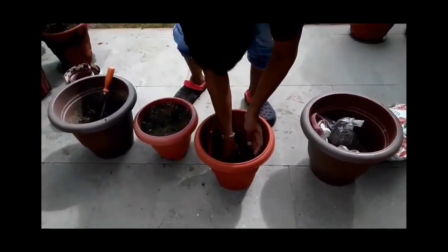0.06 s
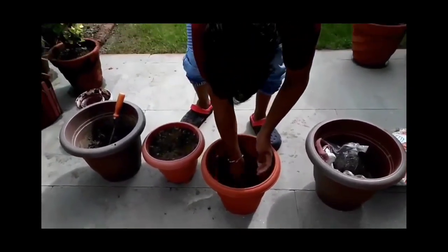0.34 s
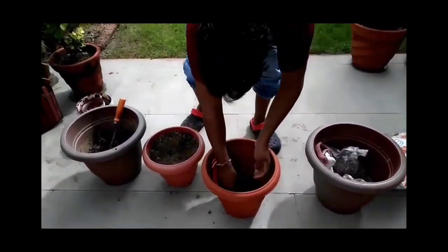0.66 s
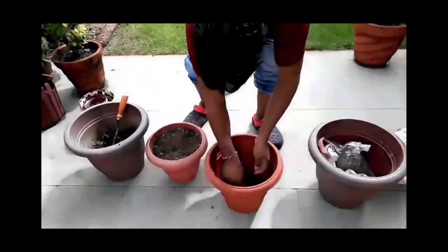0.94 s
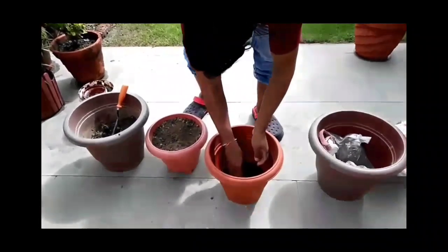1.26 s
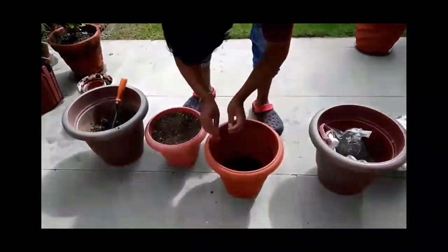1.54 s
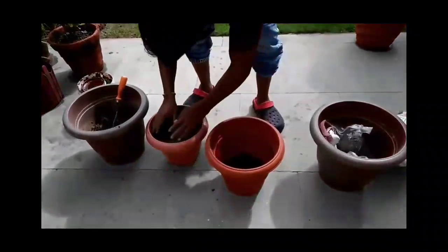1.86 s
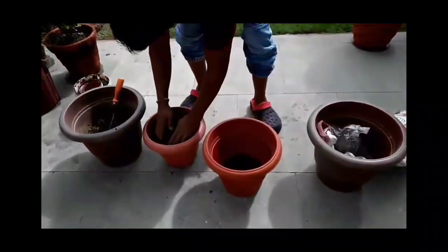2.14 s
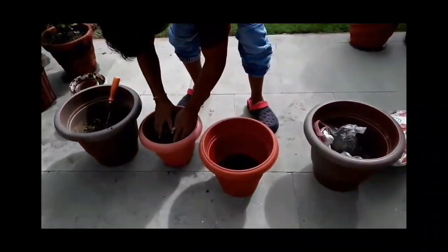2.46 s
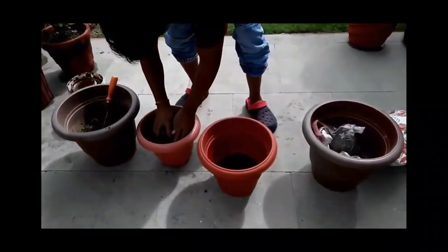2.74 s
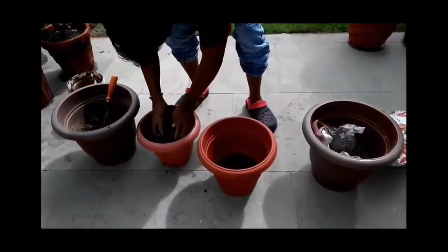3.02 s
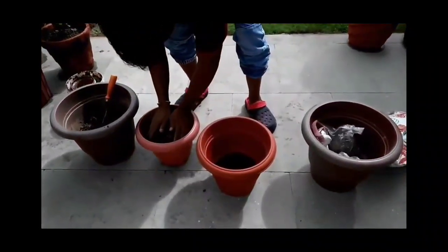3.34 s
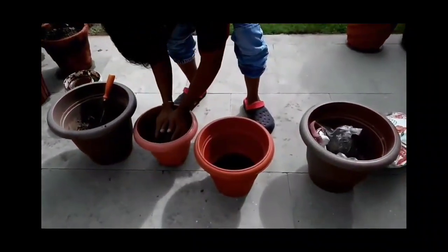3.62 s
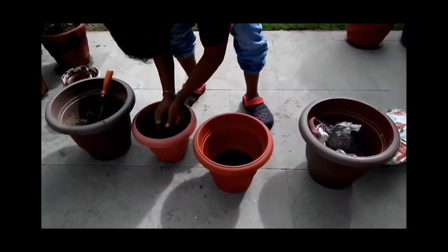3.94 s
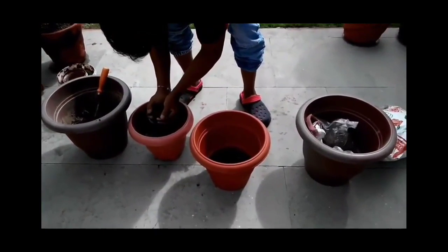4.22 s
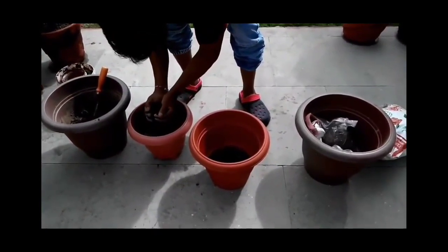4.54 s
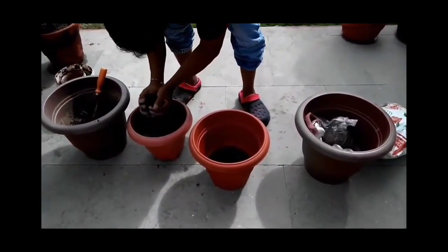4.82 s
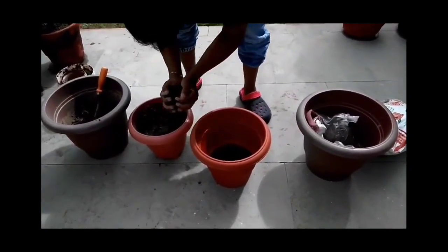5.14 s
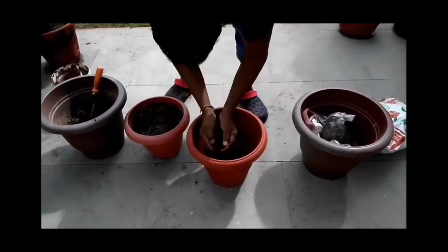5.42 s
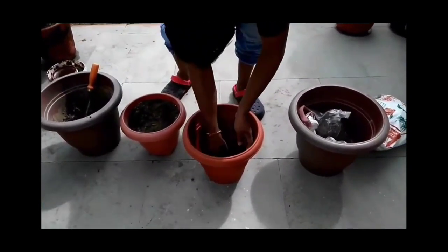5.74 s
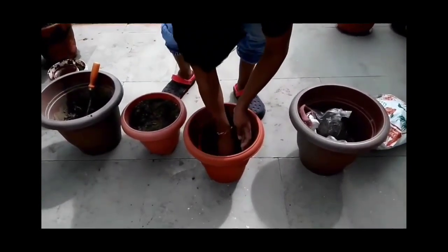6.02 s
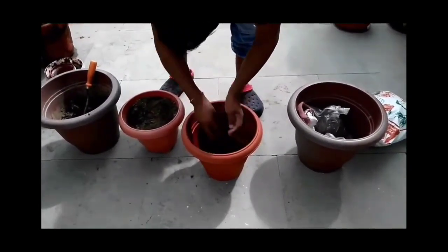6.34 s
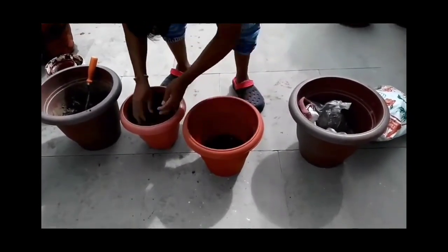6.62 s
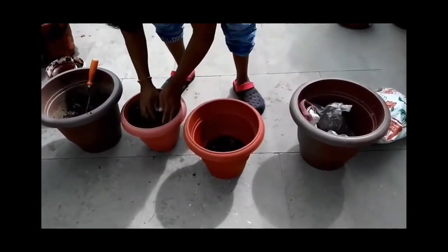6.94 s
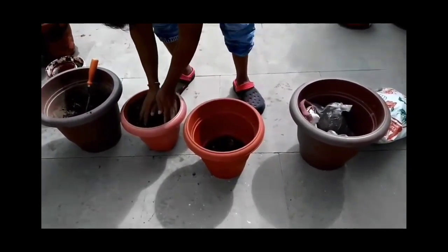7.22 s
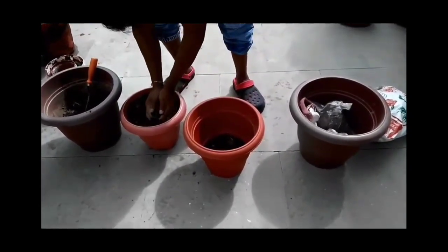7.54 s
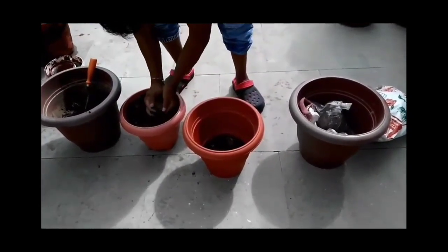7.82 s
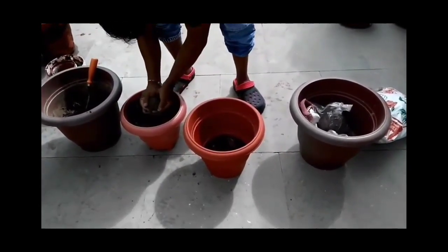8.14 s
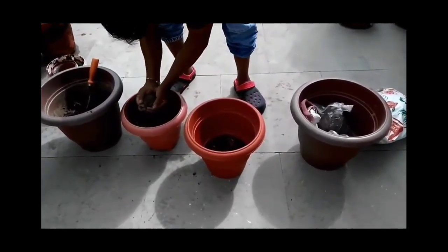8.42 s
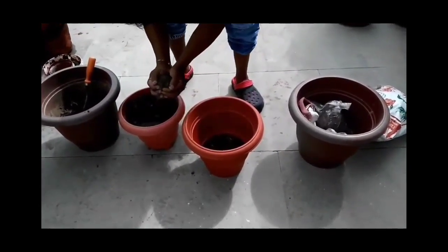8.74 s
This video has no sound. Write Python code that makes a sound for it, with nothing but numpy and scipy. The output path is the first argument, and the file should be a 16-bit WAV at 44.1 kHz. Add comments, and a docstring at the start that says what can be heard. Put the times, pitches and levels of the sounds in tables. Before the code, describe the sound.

Hands scoop and press potting soil into a plastic pot outdoors, crumbs pattering and knocking, while a bird whistles and breeze buffets the microphone.

```python
"""A paved terrace between houses, one microphone close to two plastic pots. Hands scoop potting soil
from the small pot and drop and press it into the large one: crumbs hiss and patter on the thin wall,
clods and knuckles ring it, dragged grit rasps. Farther off a bird repeats a falling whistle that echoes
from the houses. A breeze buffets the microphone. In the distance are traffic, a machine's hum,
faint insects, two thin squeals and, late on, a whistling tone."""
import sys
import numpy as np
from scipy import signal
from scipy.fft import rfft, irfft, next_fast_len
from scipy.io import wavfile
from scipy.ndimage import uniform_filter1d, map_coordinates

SR = 44100
rng = np.random.default_rng(int(sys.argv[2]) if len(sys.argv) > 2 else 0)


def unload_audio(sound):
    """Save the sound as a 16-bit wav file, at the path given as the first command line argument."""
    columns = np.transpose(np.atleast_2d(sound))
    # keep every value between -1 and 1, then stretch to whole-number steps
    steps = np.round(np.clip(columns, -1, 1) * 32767)
    wavfile.write(sys.argv[1], SR, steps.astype(np.int16))


N = 395577

# hands pushing into the soil: start_s, length_s, patter_db, hiss_db
HAND_PUSHES = [(0.0, 0.0032, -32, -35), (0.49, 0.045, -39, -43.5), (0.69, 0.15, -53, -50),
               (1.01, 0.18, -62, -57.5), (1.33, 0.14, -58, -57), (1.55, 0.32, -58.5, -60),
               (2.1, 0.22, -45.5, -51), (2.542, 0.28, -48.5, -55), (3.08, 0.35, -57.5, -65.5),
               (3.369, 0.13, -50.5, -54), (3.74, 0.18, -62, -66.5), (4.06, 0.17, -61, -54.5),
               (5.14, 0.045, -73, -60), (5.35, 0.32, -61, -62), (5.87, 0.041, -59, -76),
               (6.05, 0.18, -69, -59), (6.305, 0.27, -59.5, -53.5), (7.0, 0.16, -48.5, -58.5),
               (7.25, 0.23, -55.5, -59), (7.83, 0.27, -65.5, -58), (8.45, 0.045, -68, -58),
               (8.67, 0.04, -70, -59)]
# fine soil sifting through the fingers: peak_s, width_s, level_db
SIFTINGS = [(0.466, 0.027, -45), (1.41, 0.017, -51), (2.111, 0.024, -47.5), (2.307, 0.022, -48),
            (2.516, 0.032, -59), (2.74, 0.051, -54), (3.432, 0.03, -66), (3.52, 0.018, -44.5),
            (3.783, 0.022, -58), (5.383, 0.047, -60), (5.566, 0.016, -53), (5.87, 0.011, -46),
            (7.265, 0.18, -55.5), (7.866, 0.015, -55), (8.04, 0.013, -52), (8.702, 0.017, -54)]
# spells with the hands in the small pot: start_s, end_s
SMALL_POT_SPELLS = [(1.95, 3.5), (6.75, 12)]
# crumbs on the large pot's wall: frequency_hz, level_db
LARGE_PATTER_SPECTRUM = [(250, -45), (500, -28), (800, -41), (1150, 2.5), (1600, 11.5), (2200, 6.5),
                         (2700, 8), (3400, 3.5), (4400, -23), (6500, -16), (12000, -58)]
# crumbs on the small pot's wall: frequency_hz, level_db
SMALL_PATTER_SPECTRUM = [(250, -34), (500, -29), (800, -37), (1200, 4), (1550, 8.5), (1850, 20.5),
                         (2300, 11), (2700, 17), (3200, 3.5), (4000, -42), (6500, -1), (12000, -49)]
# hiss of fine crumbs: frequency_hz, level_db
CRUMB_SPECTRUM = [(1000, -69), (3000, -12), (4500, -7), (6500, 6.5), (8500, 8), (10500, 8.5), (12500, 5.5),
                  (14500, 2.5)]
# resonances of the large pot's hollow: pitch_hz, width_hz, gain_db
HOLLOW_MODES = [(353, 12, 7.5), (642, 28, 2), (1088, 64, -3.5), (1290, 34, 1), (1370, 18, -3),
                (2038, 20, -4), (2190, 51, -3.5), (2426, 36, -1), (4940, 91, 2.5), (6700, 26, -5)]

# breeze on the microphone between gusts: time_s, level_db
BREEZE_LEVELS = [(0.0, -32), (0.25, -36.5), (0.62, -29.5), (1.12, -38.5), (1.65, -33.5), (2.22, -39.5),
                 (3.32, -34.5), (3.72, -39.5), (4.47, -33), (4.8, -38), (5.69, -32.5), (6.32, -42.5),
                 (6.57, -42.5), (6.8, -37), (7.04, -40), (7.32, -42.5), (7.77, -33), (8.97, -36.5)]
# gusts on the microphone: peak_s, width_s, pressure_db, eddy_db
MIC_GUSTS = [(0.044, 0.034, -17.5, -44), (0.19, 0.038, -22.5, -48), (0.504, 0.018, -23, -40),
             (0.597, 0.011, -18.5, -38), (0.672, 0.0089, -12.5, -28), (1.33, 0.039, -28, -46),
             (1.735, 0.011, -22, -46), (2.498, 0.033, -27.5, -52), (2.73, 0.032, -29.5, -33.5),
             (3.315, 0.03, -25.5, -59), (4.404, 0.022, -17.5, -21), (5.23, 0.047, -27, -34.5),
             (5.557, 0.067, -28, -42), (5.88, 0.17, -30.5, -55), (6.61, 0.03, -24.5, -26),
             (6.757, 0.08, -23.5, -42), (6.899, 0.07, -25, -26), (7.63, 0.031, -19.5, -37),
             (7.954, 0.011, -19, -43), (8.398, 0.026, -15.5, -20.5)]
# rumble of air pushing on the microphone: frequency_hz, level_db
BUFFET_SPECTRUM = [(10, -13.5), (22, 6), (40, 2.5), (70, -6), (100, -13), (150, -26), (250, -44),
                   (500, -46), (1000, -101)]
# eddies shed by a gust: frequency_hz, level_db
EDDY_SPECTRUM = [(20, -31.5), (60, 4), (98, -10), (130, -13.5), (200, -28.5), (400, -54.5), (1000, -88)]
# far murmur of the neighbourhood: frequency_hz, level_db
MURMUR_SPECTRUM = [(60, 2.5), (160, 3.5), (250, 2.5), (340, 1.5), (390, -10.5), (520, -10.5), (720, -9),
                   (950, -4.5), (1250, -10.5), (1750, -7.5), (2600, -19.5), (4000, -79), (6000, -53),
                   (7200, -28), (10300, -24), (14000, -80)]
# tones of a far machine: pitch_hz, level_db
HUM_TONES = [(288, -60.5), (312.8, -57.5)]
# slow rise and fall of that hum: time_s, gain_db
HUM_GAINS = [(0, 0.5), (1.3, -8.5), (3.1, -3.5), (3.8, -0.5), (5, 1), (7, 0), (8.97, 2.5)]
# the high insect band as heard, with uneven dropouts in level: time_s, level_db
HIGH_BAND_LEVELS = [(0, -63), (1.0, -62), (1.42, -71), (1.7, -60.5), (2.05, -66), (2.5, -64), (2.9, -59.5),
                    (3.25, -71.5), (3.5, -56), (3.88, -74.5), (4.12, -57), (4.5, -68), (4.68, -61.5),
                    (5.08, -69), (5.35, -59.5), (5.7, -80), (6.1, -69), (6.95, -72), (7.5, -76), (7.8, -64),
                    (8.25, -72), (8.5, -60), (8.85, -79)]

# clods and knuckles striking a pot: start_s, level_db, ring_centre_hz, snap_gain_db
POT_KNOCKS = [(0.0075, -10.5, 2090, -4), (0.073, -11.5, 1390, -25), (0.094, -8.5, 1720, -24),
              (0.103, -17, 2100, -7), (0.107, -12.5, 1790, -16), (0.117, -25, 2300, -16),
              (0.123, -17, 2100, -14), (0.128, -20, 2300, -3), (0.182, -22.5, 2220, -24),
              (0.238, -26.5, 2390, -22), (0.242, -29, 2300, -25), (0.42, -22, 2600, 9),
              (0.476, -23, 1500, -6), (0.491, -19, 1340, 0.5), (0.513, -15.5, 2080, -8),
              (0.521, -21, 2060, -5), (0.585, -23.5, 2380, -14), (0.609, -24.5, 1520, -22),
              (0.656, -24.5, 1540, -25), (0.699, -26, 2870, -15), (0.728, -34, 1380, -1),
              (0.736, -33.5, 1600, -16), (0.848, -35, 2520, -6), (1.6973, -6, 2340, -9),
              (1.7067, -20, 1730, -27), (2.09, -31, 2520, -3), (2.18, -25, 1880, -24),
              (2.265, -28, 1830, -22), (2.409, -32, 1970, -7), (2.551, -40, 2260, -16),
              (2.602, -33, 1840, -20), (2.72, -32, 2900, -18), (3.056, -25.5, 1920, -32),
              (3.061, -33, 1900, -32), (3.442, -21.5, 1880, -12), (3.509, -28, 1800, -12),
              (4.115, -32, 1850, -13), (4.169, -31.5, 2280, 3), (4.223, -42, 2100, -14),
              (5.665, -21, 2140, -15), (5.791, -5, 1330, -30), (5.796, -14, 1520, -26),
              (5.877, -8.5, 2270, -13), (5.886, -14, 2170, -15), (5.894, -14.5, 2460, -33),
              (5.916, -15.5, 1600, -27), (6.01, -34, 1880, -20), (6.28, -20, 1680, 0),
              (6.296, -26, 2000, -3), (6.312, -29, 2200, 5), (6.5393, -27, 1610, 11),
              (6.545, -15, 1620, -24), (6.579, -30.5, 1420, -24), (6.977, -30, 1940, -21),
              (7.011, -34, 1890, -24), (7.145, -27, 1930, -24), (7.293, -44, 2020, -20),
              (8.092, -31, 2170, -31), (8.453, -39.5, 2070, 1)]
# modes of the plastic wall: pitch_hz, gain_db, t60_s
WALL_MODES = [(970, -4, 0.022), (1070, -4, 0.0091), (1284, -0.5, 0.01), (1630, -1.5, 0.016),
              (2014, 6.5, 0.0075), (2420, 2, 0.009), (2950, 7, 0.0073), (3420, -2, 0.015),
              (3800, 3.5, 0.009), (5830, 38, 0.0098)]
# single hard crumbs cracking: start_s, level_db, pitch_hz
GRIT_SNAPS = [(0.013, -20, 11300), (0.0131, -13.5, 8650), (0.4245, -28, 11000), (0.5846, -26, 7500),
              (0.6263, -26, 10000), (0.6725, -26, 9900), (0.85, -30.5, 9000), (1.015, -33.5, 9000),
              (3.5023, -44, 9000), (4.067, -33, 9100), (5.8258, -10.5, 11010), (5.84, -16.5, 7650),
              (5.844, -28, 10500), (5.933, -39, 6100), (5.969, -31, 10400), (6.4715, -34, 9450),
              (7.291, -29.5, 9200), (8.139, -42, 3270)]
# handfuls landing in the large pot: peak_s, rise_s, fall_s, crunch_db, thud_db
LANDINGS = [(0.11, 0.016, 0.025, -21.5, -63), (0.502, 0.024, 0.031, -29, -64),
            (5.793, 0.014, 0.026, -32, -32.5), (5.835, 0.013, 0.034, -35.5, -46),
            (5.879, 0.022, 0.016, -25.5, -36.5), (6.296, 0.014, 0.047, -34, -74)]
# crunch of loose soil: frequency_hz, level_db
CRUNCH_SPECTRUM = [(400, -28.5), (800, -14), (1200, -2.5), (1700, 1.5), (2400, 1), (3200, -6.5),
                   (4200, -13), (6000, -9), (9000, -10.5), (14000, -23)]
# thud of a handful's weight: frequency_hz, level_db
THUD_SPECTRUM = [(120, -19), (220, -2), (335, 12.5), (480, -4), (640, 7), (1050, 10), (1600, 0),
                 (4000, -66)]

# calls of the bird between the houses: start_s, level_db
BIRD_CALLS = [(1.099, -41), (2.572, -39), (4.264, -40.5), (5.384, -41), (6.592, -41), (7.933, -39)]
# course of one call: time_s, pitch_hz, gain_db
CALL_SHAPE = [(0, 6450, -12), (.036, 5720, -2), (.075, 4516, 1.5), (.11, 3730, 2), (.143, 2975, -2.5),
              (.178, 2690, -4), (.21, 2625, -7), (.25, 2586, -18)]
# fingers digging along the wall: peak_s, width_s, level_db, pitch_hz
FINGER_SCRAPES = [(2.062, 0.027, -48, 1260), (2.096, 0.01, -44.5, 2980), (2.188, 0.016, -43, 2160),
                  (2.245, 0.008, -43, 2180), (2.275, 0.015, -38, 2120), (2.301, 0.013, -40, 2450),
                  (2.35, 0.033, -54, 2430), (2.527, 0.0054, -50, 2250), (2.568, 0.005, -45, 2250),
                  (2.597, 0.0078, -45, 2240), (2.633, 0.005, -49, 2200), (3.059, 0.007, -32.5, 2030),
                  (3.371, 0.009, -47, 1920), (3.757, 0.013, -49.5, 1900), (3.832, 0.005, -52, 1900),
                  (4.185, 0.045, -51, 2280), (6.984, 0.0094, -40.5, 2060), (7.055, 0.0084, -37, 2080),
                  (7.153, 0.014, -40.5, 2080), (7.293, 0.018, -46.5, 2230), (7.484, 0.007, -46, 1880),
                  (7.969, 0.0059, -48.5, 2660), (8.003, 0.004, -48, 2600), (8.028, 0.0087, -45.5, 2420)]
# thin far squeals: start_s, end_s, pitch_hz, width_hz, level_db
FAR_SQUEALS = [(3.3, 4.035, 927, 158, -54.5), (8.143, 8.746, 3420, 280, -65.5)]
# main tone of the far whistle: time_s, level_db
WHISTLE_LEVELS = [(6.56, -84), (6.65, -47), (6.74, -58), (6.86, -65), (6.97, -46), (7.1, -58), (7.44, -60),
                  (7.54, -49.5), (7.64, -46.5), (7.72, -64.5), (7.88, -64), (8.0, -92)]
# its weaker, steadier partials: pitch_hz, level_db
WHISTLE_PARTIALS = [(2856, -62), (3213, -69)]


def amp(db):
    """Gain of a level in dB."""
    return 10 ** (np.asarray(db) / 20)


def unit(x):
    """x at rms 1."""
    return x / np.sqrt(np.mean(x ** 2) + 1e-20)


def curves(rows):
    """One value per sample for each column after the time."""
    times, *columns = np.transpose(rows)
    return [np.interp(np.arange(N) / SR, times, column) for column in columns]


def wobble(rate):
    """A smooth random curve, rate knots a second."""
    return map_coordinates(rng.standard_normal(int(N * rate / SR) + 4), [np.arange(N) * rate / SR])


def swell(peak_s, rise_s, fall_s):
    """A bell-shaped envelope with its own width on each side of the peak."""
    t = np.arange(N) / SR - peak_s
    return np.exp(-np.minimum((t / np.where(t < 0, rise_s, fall_s)) ** 2 / 2, 50))


def add(track, start_s, sound):
    """Mix a sound into the track."""
    start = max(round(start_s * SR), 0)
    track[start:start + len(sound)] += sound[:len(track) - start]


def colour(x, spectrum):
    """x through a minimum-phase filter with the given spectrum."""
    size = 2 ** 14
    hz, db = np.transpose(spectrum)
    gain = amp(np.interp(np.log(np.fft.rfftfreq(size, 1 / SR) + 1), np.log(hz), db))
    cepstrum = irfft(np.log(gain))
    cepstrum[1:size // 2] *= 2
    cepstrum[size // 2 + 1:] = 0
    return signal.fftconvolve(x, irfft(np.exp(rfft(cepstrum))))[:len(x)]


def resonance(x, hz, width_hz):
    """The part of x that one resonance passes."""
    return signal.lfilter(*signal.iirpeak(hz, hz / width_hz, fs=SR), x)


def noise(spectrum, samples=N):
    """Coloured noise of rms 1."""
    return unit(colour(rng.standard_normal(samples), spectrum))


def narrow_noise(hz, width_hz):
    """Noise of rms 1 around one frequency."""
    size = next_fast_len(N, True)
    band = np.exp(-2 * ((np.fft.rfftfreq(size, 1 / SR) - hz) / width_hz) ** 2)
    return unit(irfft(rfft(rng.standard_normal(size)) * band)[:N])


def grains(rate, spread_db, tint_db):
    """Random tiny impacts of unequal size, rate a second, each with a colour of its own."""
    falls = rng.random(N) < rate / SR
    taps = falls * rng.choice([-1, 1], N) * amp(spread_db * np.clip(rng.standard_normal(N), -2, 2))
    spectra = signal.stft(taps, nperseg=256)[2]
    tint = unit(uniform_filter1d(rng.standard_normal(spectra.shape), size=4, axis=0))
    return unit(signal.istft(spectra * amp(tint_db * tint))[1][:N])


def echo(x, t60_s, delay_s):
    """x returned by the walls around, through a fresh diffuse tail of energy 1."""
    t = np.arange(SR) / SR
    tail = rng.standard_normal(SR) * amp(-60 * t / t60_s) * (t > delay_s)
    return signal.fftconvolve(x, tail / np.linalg.norm(tail))


def terrace(x, wet_db):
    """A sound close to the microphone, with the short answer of the terrace."""
    early = echo(x, t60_s=0.035, delay_s=0.006)
    late = amp(0.5) * echo(x, t60_s=0.39, delay_s=0.019)
    return x + amp(wet_db) * (early + late)[:N]


def hollow(x):
    """A sound inside the large pot, coloured by its hollow."""
    return amp(-2) * (x + sum(amp(db) * resonance(x, hz, width) for hz, width, db in HOLLOW_MODES))


def in_small_pot(t):
    """True while the hands are in the small pot."""
    return np.any([(t > start) & (t < end) for start, end in SMALL_POT_SPELLS], axis=0)


def push(start_s, length_s, attack_s=0.05, settle_db_per_s=79):
    """Envelope of one push: it eases in, holds while the hands move and dies as the soil settles."""
    t = np.arange(N) / SR - start_s
    ease = np.sin(np.pi / 2 * np.clip(t / attack_s + 0.5, 0, 1)) ** 2
    return ease * amp(-settle_db_per_s * np.maximum(t - length_s, 0))


def soil(lowpass_below_db=-59.5):
    """Close up, crumbs fall in clumps: heavy ones patter on the wall, coarse crackle, fine hiss."""
    heavy, fine = amp(-66.5), amp(-77.5)  # loose crumbs keep falling between pushes
    for start_s, length_s, patter_db, hiss_db in HAND_PUSHES:
        effort = push(start_s, length_s)
        heavy = np.maximum(heavy, amp(patter_db) * effort)
        fine = np.maximum(fine, amp(hiss_db) * effort)
    clumps = wobble(50)
    taps = grains(rate=900, spread_db=5, tint_db=4) * amp(2.2 * clumps)
    small_pot = unit(colour(taps, SMALL_PATTER_SPECTRUM))
    large_pot = unit(hollow(colour(taps, LARGE_PATTER_SPECTRUM)))
    patter = np.where(in_small_pot(np.arange(N) / SR), small_pot, large_pot)
    dust = grains(rate=5000, spread_db=3.6, tint_db=4) * amp(1.8 * clumps)
    crackle = amp(-9) * grains(rate=80, spread_db=2.2, tint_db=6.5)
    kneading = amp(2 * wobble(9))
    hiss = unit(colour(kneading * (dust + crackle), CRUMB_SPECTRUM))
    sifting = sum(amp(db) * swell(peak_s, width_s, width_s) for peak_s, width_s, db in SIFTINGS)
    hiss_level = np.hypot(fine, sifting)
    # the hiss is low-passed near 11.8 kHz whenever it is quiet
    lowpassed = signal.sosfiltfilt(signal.butter(6, 11800, fs=SR, output="sos"), hiss)
    bypass = hiss_level ** 2 / (hiss_level ** 2 + amp(lowpass_below_db) ** 2)
    hiss = lowpassed + bypass * (hiss - lowpassed)
    return terrace(heavy * patter + hiss_level * hiss, wet_db=-8)


def wind(flutter_db=3):
    """Air pushes right on the microphone; sudden gusts shed smaller, higher eddies."""
    breeze_db, = curves(BREEZE_LEVELS)
    pressure = amp(breeze_db + 1 + flutter_db * wobble(24))
    eddies = 0
    for peak_s, width_s, pressure_db, eddy_db in MIC_GUSTS:
        gust = swell(peak_s, width_s, width_s)
        pressure = np.hypot(pressure, amp(pressure_db) * gust)
        eddies += amp(eddy_db) * gust
    return pressure * noise(BUFFET_SPECTRUM) + eddies * noise(EDDY_SPECTRUM)


def traffic():
    """Far traffic blends into an almost steady murmur."""
    return amp(-50.5 + 0.32 * wobble(1.77)) * noise(MURMUR_SPECTRUM)


def machine_hum():
    """A far machine holds two low tones that waver in level and phase."""
    out, t = np.zeros(N), np.arange(N) / SR
    swell_db, = curves(HUM_GAINS)
    for hz, db in HUM_TONES:
        level = amp(db + swell_db + 2 * wobble(4) - 0.5)
        out += level * unit(np.sin(2 * np.pi * hz * t + 0.5 * wobble(5)))
    return out


def insects():
    """A high, shimmering insect band near 5.3 kHz, with uneven dropouts in level."""
    level_db, = curves(HIGH_BAND_LEVELS)
    shimmer_db = 2.4 * wobble(25) - 1
    return amp(level_db + shimmer_db) * narrow_noise(hz=5270, width_hz=590)


def snap(t60_s, hz):
    """A crumb of grit cracking: a sharp break and its splinters, ringing briefly, peak 1."""
    t = np.arange(SR // 20) / SR
    splinters = rng.standard_normal(len(t)) * amp(-60 * t / t60_s)
    crack = colour(splinters + 4 * (t == 0), CRUMB_SPECTRUM)
    crack += amp(-1.5) * resonance(crack, hz, width_hz=1400)
    return crack / np.abs(crack).max()


def afterglow(spectrum, early_t60_s, late_t60_s=0.41):
    """The diffuse answer of pot and terrace to one sharp blow."""
    t = np.arange(SR // 3) / SR
    decay = amp(-60 * t / early_t60_s) + amp(-4.5 - 60 * t / late_t60_s)
    onset = 1 - np.exp(-t / 0.0014)
    return noise(spectrum, len(t)) * decay * onset


def knocks(bump_hz=610, bump_t60_s=0.0021):
    """Close blows ring the soil-damped pots; where each lands decides which modes speak."""
    small_pot, large_pot = np.zeros(N), np.zeros(N)
    t = np.arange(SR // 20) / SR
    mode_hz, mode_db, t60_s = np.transpose(WALL_MODES)[:, :, None]
    bump = np.sin(2 * np.pi * bump_hz * t) * amp(-12 - 60 * t / bump_t60_s)  # the wall gives way
    for start_s, db, centre_hz, snap_db in POT_KNOCKS:
        uneven, detune, phase = rng.standard_normal((3, len(WALL_MODES), 1))
        focus_db = 17.5 - db  # a light touch wakes fewer modes
        strength = amp(mode_db + 2 * uneven - focus_db * np.log2(mode_hz / centre_hz) ** 2)
        modes = np.sin(2 * np.pi * mode_hz * (1 + 0.032 * detune) * t + np.pi * phase)
        ring = np.sum(strength * amp(-60 * t / t60_s) * modes, axis=0)
        ring *= 1 - np.exp(-t / 0.0008)
        blow = ring / np.abs(ring).max() + bump + amp(snap_db) * snap(t60_s=0.025, hz=7300)
        pot = small_pot if in_small_pot(start_s) else large_pot
        add(pot, start_s, amp(db) * blow)
        add(pot, start_s, amp(db - 24) * afterglow(CRUNCH_SPECTRUM, early_t60_s=0.075))
    return small_pot + hollow(large_pot)


def grit():
    """Single hard crumbs crack close to the microphone, each at its own pitch."""
    out = np.zeros(N)
    for start_s, db, hz in GRIT_SNAPS:
        add(out, start_s, amp(db) * snap(t60_s=0.012, hz=hz))
        add(out, start_s, amp(db - 23) * afterglow(CRUMB_SPECTRUM, early_t60_s=0.1))
    return out


def handfuls():
    """Soil lands in the large pot: a dense crunch with small clods, over the thud of its weight."""
    crumbs = grains(rate=2200, spread_db=4, tint_db=5.5) * amp(2.4 * wobble(130))
    clods = unit(colour(grains(rate=220, spread_db=2.5, tint_db=7), LARGE_PATTER_SPECTRUM))
    crunch = unit(unit(colour(crumbs, CRUNCH_SPECTRUM)) + amp(-3) * clods)
    thud = unit(colour(grains(rate=990, spread_db=2, tint_db=2), THUD_SPECTRUM))
    out = np.zeros(N)
    for peak_s, rise_s, fall_s, crunch_db, thud_db in LANDINGS:
        out += swell(peak_s, rise_s, fall_s) * (amp(crunch_db) * crunch + amp(thud_db) * thud)
    return terrace(hollow(out), wet_db=-10)


def bird(rasp_hz=160, flutter_db=3):
    """Out between the houses, a raspy whistle slides down and clears as it levels off."""
    out, t = np.zeros(N), np.arange(int(CALL_SHAPE[-1][0] * SR)) / SR
    glide_hz, shape_db = [curve[:len(t)] for curve in curves(CALL_SHAPE)]
    envelope = amp(shape_db) * signal.windows.tukey(len(t), 0.1)
    depth_hz = rasp_hz * np.clip((glide_hz - glide_hz.min()) / 900, 0.5, 1)
    rasp, flutter = wobble(700), wobble(150)
    for start_s, db in BIRD_CALLS:
        now = round(start_s * SR) + np.arange(len(t))
        pitch_hz = glide_hz * (1 + 0.0054 * rng.standard_normal()) + depth_hz * rasp[now]
        call = amp(db + flutter_db * flutter[now]) * envelope * np.sin(2 * np.pi * np.cumsum(pitch_hz) / SR)
        add(out, start_s, amp(-3) * call)  # straight to the microphone
        add(out, start_s, amp(-8.5) * echo(call, t60_s=0.16, delay_s=0.003))  # close walls
        add(out, start_s, amp(-4.5) * echo(call, t60_s=0.58, delay_s=0.028))  # houses beyond
    return out


def scrapes():
    """Close up, grit dragged over the plastic rasps around one resonance of the wall."""
    out, t = np.zeros(N), np.arange(SR // 3) / SR
    middle_s = t.mean()
    slips = grains(rate=3200, spread_db=2.6, tint_db=4)
    for peak_s, width_s, db, hz in FINGER_SCRAPES:
        start_s = peak_s - middle_s
        wall = signal.butter(2, [hz / 1.224, hz * 1.05], "bandpass", fs=SR, output="sos")
        rasp = unit(signal.sosfilt(wall, slips[round(start_s * SR):][:len(t)]))
        stroke = np.exp(-((t - middle_s) / width_s) ** 2 / 2)
        add(out, start_s, amp(db) * rasp * stroke)
    return terrace(out, wet_db=-9)


def squeals(fade_s=0.073):
    """Thin squeals in the distance, each a narrow band of noise."""
    out, t = np.zeros(N), np.arange(N) / SR
    for start_s, end_s, hz, width_hz, db in FAR_SQUEALS:
        fade = np.clip(np.minimum(t - start_s, end_s - t) / fade_s, 0, 1)
        out += amp(db) * fade * narrow_noise(hz, width_hz)
    return out


def whistle(pitch_hz=2497, partials_start_s=6.7, partials_end_s=7.87, fade_s=0.34):
    """A far, nearly pure whistling tone swells three times, with two faint partials above it."""
    t = np.arange(N) / SR

    def tone(hz):
        return unit(np.sin(2 * np.pi * hz * t + 0.75 * wobble(22))) * amp(2.2 * wobble(12) - 1)

    level_db, = curves(WHISTLE_LEVELS)
    fade = np.clip(np.minimum(t - partials_start_s, partials_end_s - t) / fade_s, 0, 1)
    return amp(level_db) * tone(pitch_hz) + fade * sum(amp(db) * tone(hz) for hz, db in WHISTLE_PARTIALS)


def scene():
    """The pots close by, the bird, the breeze and the far neighbourhood at one microphone."""
    pots = soil() + handfuls() + scrapes() + knocks() + grit()
    open_air = bird() + wind()
    distance = traffic() + machine_hum() + squeals() + insects() + whistle()
    return (pots + open_air + distance)[None]


def record(dry, top_hz=14400):
    """The microphone chain passes nothing above its band limit."""
    size = next_fast_len(N + SR // 2)
    passband = np.fft.rfftfreq(size, 1 / SR) < top_hz
    return irfft(rfft(dry, size) * passband, size)[:, :N]


dry = scene()
out = record(dry)
unload_audio(out)
```